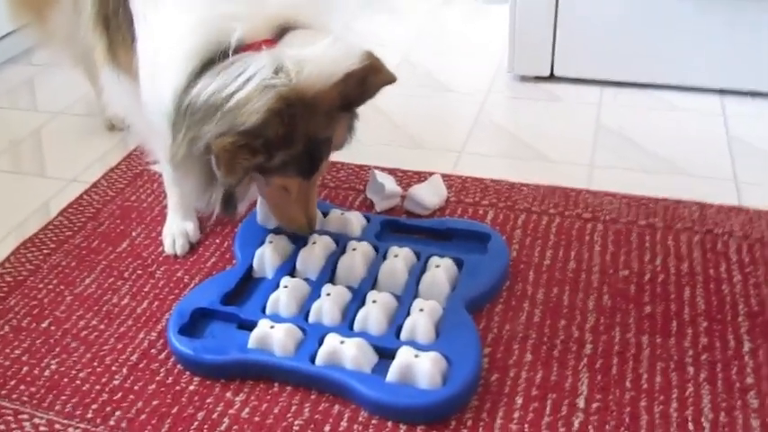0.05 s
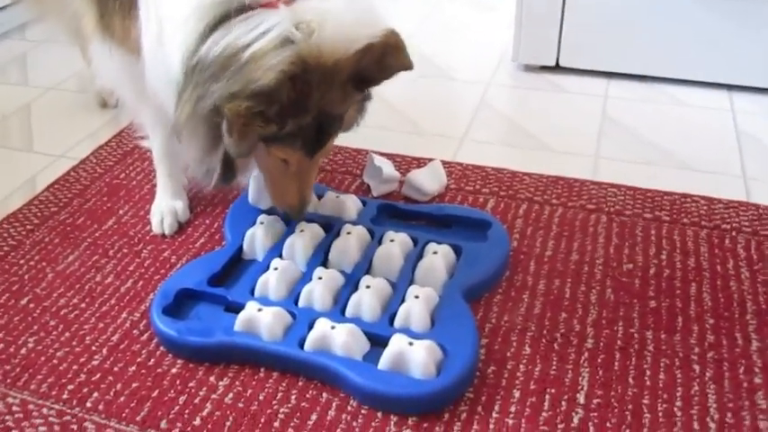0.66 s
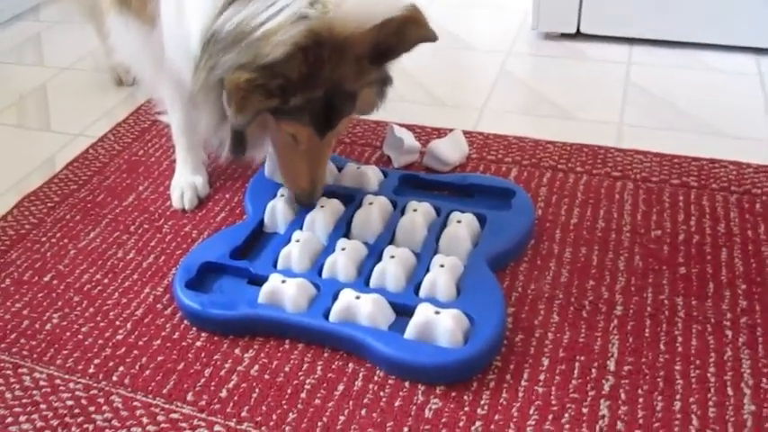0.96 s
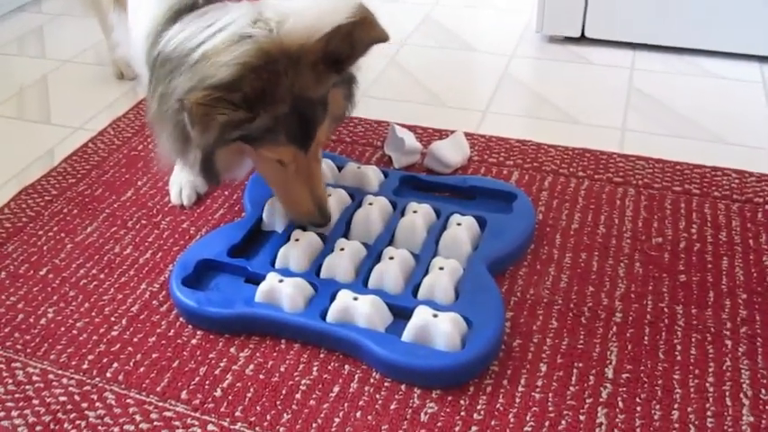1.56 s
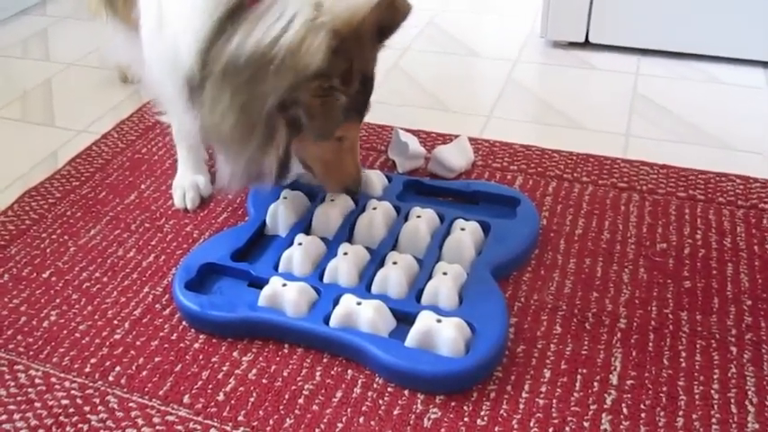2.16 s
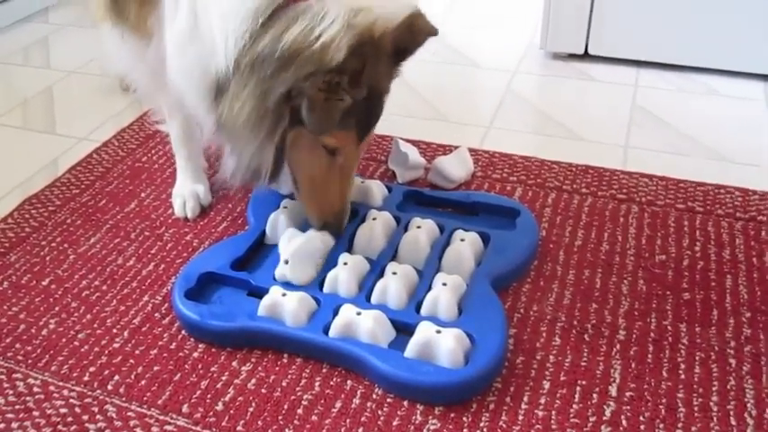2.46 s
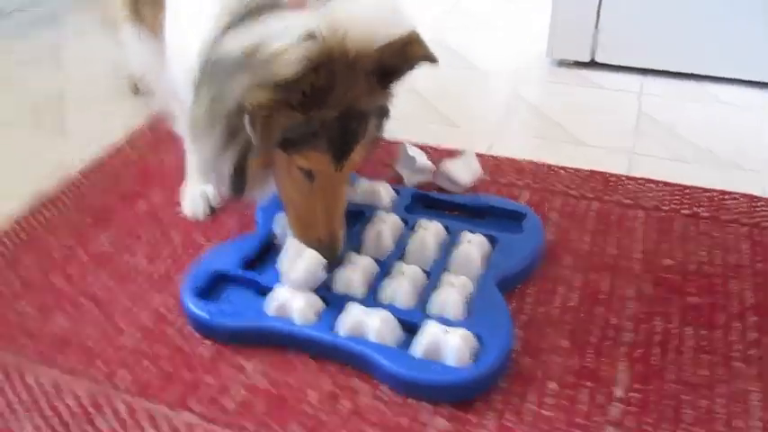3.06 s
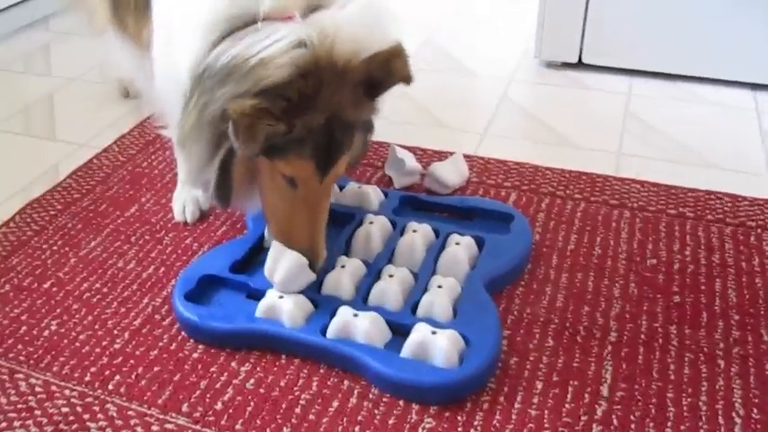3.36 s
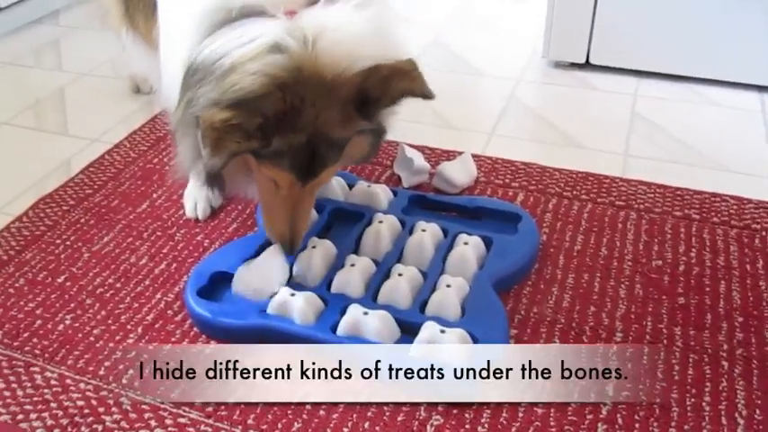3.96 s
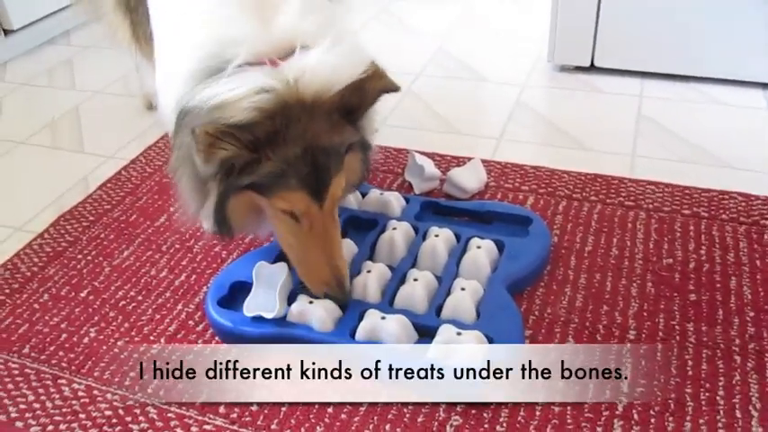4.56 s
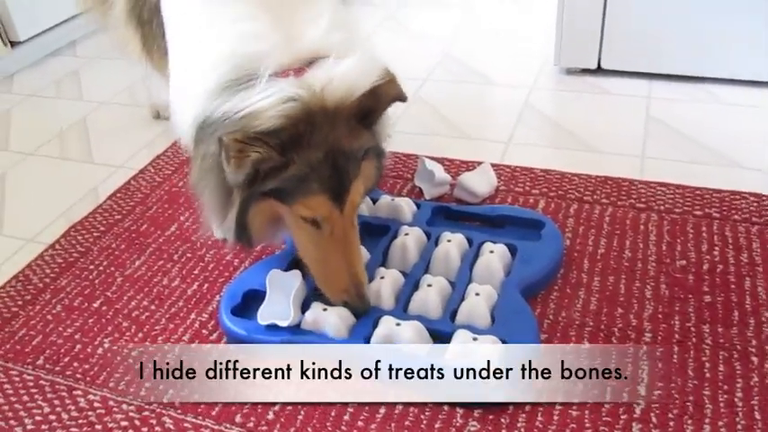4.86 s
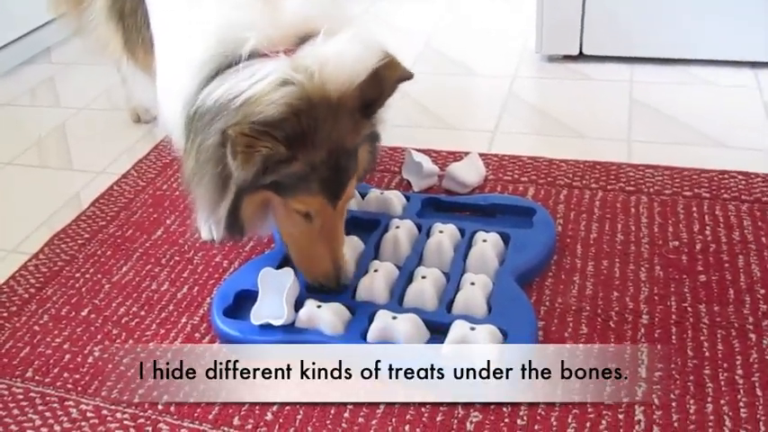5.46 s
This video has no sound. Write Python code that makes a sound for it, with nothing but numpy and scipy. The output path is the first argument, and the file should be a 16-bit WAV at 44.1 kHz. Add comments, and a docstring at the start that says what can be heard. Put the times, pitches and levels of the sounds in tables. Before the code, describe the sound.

A dog nudges plastic bones around a puzzle tray, making irregular hollow clacks and short scrapes that ring briefly in a tiled room.

```python
"""A dog at a puzzle tray

A dog noses hollow plastic bones about in a moulded tray on a rug in a tiled kitchen. The pieces knock,
slide and rattle in their wells, and the tray thuds on the rug. Fur brushes the plastic and a collar tag
tinkles. The hard room rings after every knock, over a faint steady rumble and hiss."""
import sys
import numpy as np
from scipy import signal
from scipy.fft import rfft, irfft
from scipy.io import wavfile

SR = 44100
rng = np.random.default_rng(int(sys.argv[2]) if len(sys.argv) > 2 else 0)


def transcribe(signal):
    """Save signal, clipped to [-1, 1], as a 16-bit WAV file at the path in sys.argv[1]."""
    frames = np.atleast_2d(signal).T
    limited = np.clip(frames, -1, 1)
    pcm = np.round(limited * 32767).astype(np.int16)
    wavfile.write(sys.argv[1], SR, pcm)


N = 252252
TIME = np.arange(N) / SR


def from_db(db):
    """Turn decibels into a number to multiply by."""
    return 10 ** (np.asarray(db) / 20)


def rms_one(x):
    """Scale a sound so that its average level (rms) is 1."""
    return x / np.sqrt(np.mean(x ** 2) + 1e-20)


def at_hz(rows, hz):
    """Read between the rows of a table whose first column is frequency."""
    points, *columns = np.transpose(rows)
    return [np.interp(np.log(hz + 1e-9), np.log(points), c) for c in columns]


def band(x, low, high, order=2):
    """Keep the part of a sound between two frequencies in Hz."""
    sos = signal.butter(order, [low, min(high, SR / 2 - 1)], "band", fs=SR, output="sos")
    return signal.sosfilt(sos, x)


def add(out, s, sound):
    """Mix a sound in at a time in seconds."""
    start = max(round(s * SR), 0)
    out[start:start + len(sound)] += sound[:max(N - start, 0)]


def dying(t, t60):
    """A fade. Its ring time, t60, is the seconds it takes to fall 60 dB."""
    return np.exp(-np.log(1000) * t / t60)


def resonate(x, hz, t60):
    """Make a sound ring at one pitch."""
    r = np.exp(-np.log(1000) / (t60 * SR))
    feedback = [1, -2 * r * np.cos(2 * np.pi * hz / SR), r * r]
    return signal.lfilter(np.array([1, 0, -1]) * (1 - r * r) / 2, feedback, x + 1e-18)


def ring_together(x, tones):
    """Make a sound ring at several pitches, every second one flipped in sign."""
    return sum((-1) ** k * from_db(db) * resonate(x, hz, t60) for k, (hz, db, t60) in enumerate(tones))


def burst(t60, first_touch=2.39, size=2600):
    """The force of one touch: a first contact, then a quick crunch of tiny ones."""
    force = rng.standard_normal(size) * dying(TIME[:size], t60)
    force[0] += first_touch
    return force


def struck(x, db, size=220):
    """Scale a ring so that its first 5 milliseconds have the given level."""
    return from_db(db) * x / np.sqrt(np.mean(x[:size] ** 2))


# The tone of the background. Each row: frequency in Hz, relative level in dB.
BACKGROUND_TONE = [(15, 11), (25, -5), (74, 1.5), (130, -6.5), (195, -6), (363, -8), (545, -10),
                   (887, -12.5), (2610, -19.5), (3520, -19.5), (4250, -20), (5140, -22), (8140, -26),
                   (14800, -33.5), (16000, -30)]

def background(level_db=-55):
    """Steady house rumble and microphone hiss."""
    db, = at_hz(BACKGROUND_TONE, np.fft.rfftfreq(N, 1 / SR))
    noise = irfft(rfft(rng.standard_normal(N)) * from_db(db), N)
    return from_db(level_db) * rms_one(band(noise, 25.6, 13000))


# The room's echo. Each row: frequency in Hz, dB against the direct sound, ring time in seconds.
ROOM_ECHO = [(149, -4, 0.4), (480, -3, 0.43), (970, -2.5, 0.36), (1610, -1.5, 0.41), (3500, -8, 0.39),
             (6340, -3.5, 0.42), (14300, -18.5, 0.74)]

def kitchen(first_echo_s=0.0024, build_s=0.00021, lumpy_db=4.0, count=16, size=22000):
    """How a click carries from each place on the tray: directly, then off tiles and cupboards."""
    t = TIME[:size]
    arrival = 1 - np.exp(-np.maximum(t - first_echo_s, 0) / build_s)
    lumps = np.repeat(rng.standard_normal((count, size // 40 + 1)), 40, axis=1)[:, :size]
    unevenness = from_db(lumpy_db * lumps * dying(t, 0.091))   # early echoes stand out, later ones blur
    echoes = rng.standard_normal((2, count, size)) * arrival * unevenness
    places = np.zeros((count, size))
    edges_hz = np.geomspace(100, 18000, num=16)
    for k, (low, high) in enumerate(zip(edges_hz, edges_hz[1:])):
        db, t60 = at_hz(ROOM_ECHO, np.sqrt(low * high))
        tail = band(echoes[k % 2] * dying(t, t60), low, high, order=3)
        energy = np.sum(tail ** 2, axis=1, keepdims=True)
        places += from_db(db) * tail * np.sqrt(2 * (high - low) / SR / energy)
    places[:, 0] += 1   # the direct sound
    return places


# Bumps on the rug. Each row: start in seconds, lowest pitch in Hz, strength in dB.
RUG_THUDS = [(.034, 237, -28.5), (1.572, 74.6, -52), (3.698, 80, -44), (4.04, 77, -32), (4.529, 78, -49)]
# Tones of the bending tray. Each row: multiple of the lowest pitch, relative dB, cycles to die away.
BENDING_TONES = [(1, 0, 19), (1.5, 8, 12.2), (2.75, -6.5, 18)]

def thuds(rise_s=0.0077, size=22000):
    """The whole tray bends and bumps softly into the rug."""
    out, t = np.zeros(N), TIME[:size]
    rise = 1 - np.exp(-t / rise_s)
    for s, lowest_hz, db in RUG_THUDS:
        for multiple, tone_db, cycles in BENDING_TONES:
            hz = lowest_hz * multiple
            tone = np.sin(2 * np.pi * hz * t) * dying(t, cycles / hz)
            add(out, s, from_db(db + tone_db) * tone * rise)
    return out


# The tag touches its ring. Each row: start in seconds, strength in dB.
TAG_TINKLES = [(.115, -64), (1.666, -67), (2.182, -53), (2.187, -45.5), (2.192, -44), (2.335, -50),
               (3.78, -60)]
# The tag's tones. Each row: pitch in Hz, relative level in dB, ring time in seconds.
TAG_TONES = [(3500, -10, 0.0026), (7670, 1, .022), (8300, 0, .01), (9800, -6, 0.0017), (12750, -6, 0.084),
             (12600, -15, 0.014), (14700, -22, .008)]

def collar_tag(rub_t60=0.035):
    """A small metal tag rubs its ring and gives a short, high tinkle."""
    out = np.zeros(N)
    for s, db in TAG_TINKLES:
        for hz, tone_db, t60 in TAG_TONES:
            add(out, s, struck(resonate(burst(rub_t60), hz, t60), db + tone_db))
    return out


# Strokes of the muzzle. Each row: start and end in seconds, dB it swells to, centre pitch in Hz.
FUR_BRUSHES = [(0.392, 0.436, -48.5, 5500), (3.921, 4.054, -55, 1730), (4.197, 4.576, -52, 5560),
               (5.179, 5.397, -50, 3150), (5.537, 5.595, -54.5, 7000)]

def brushes(grain_db=4, ring_cycles=12, air_db=4.5, swell_db=8):
    """Fur rubs on plastic: a grainy, swelling swish with airy noise around it."""
    for start, end, db, hz in FUR_BRUSHES:
        size = round((end - start) * SR)
        noise, grain = rng.standard_normal((2, size))
        friction = noise * from_db(grain_db * grain)
        swish = rms_one(resonate(friction, hz, ring_cycles / hz))
        air = from_db(air_db) * rms_one(band(friction, hz / 4, 1.8 * hz))
        swell = from_db(np.linspace(db - swell_db, db, size))
        yield start, swell * rms_one(swish + air) * signal.windows.tukey(size, 0.4)


# The walls' longer tones. Each row: pitch in Hz, dB against the direct sound, ring time in seconds.
WALL_TONES = [(693, -7, 0.14), (918, -10, 0.11), (1170, 0, 0.74), (1387, 3.5, 0.066), (1687, 0.5, 0.079),
              (3410, -10, 0.18)]

def tray_walls(x):
    """The walls of the tray ring on after a touch."""
    return x + ring_together(x, WALL_TONES)


# The tray's low tones. Each row: pitch in Hz, relative level in dB, ring time in seconds.
BODY_TONES = [(289, -11, 0.039), (438, -11.5, 0.037), (610, -10.5, 0.018), (691.4, -4, 0.037),
              (880, 1.5, 0.02), (945, 2.5, 0.02), (1150, -8.5, 0.0087)]

def tray_body(force):
    """The body of the tray answers a force with a short, low ring."""
    return band(ring_together(force, BODY_TONES), 470, 1200)


def tray_share_db(hz, db_per_octave=-10, usual_hz=1116):
    """Pieces that sound higher move the tray less."""
    return db_per_octave * np.log2(max(hz / usual_hz, 1))


def scrape(seconds, first_db, last_db, chatter_hz, rasp_db, slips_per_s=5000, spread_db=2.5):
    """Many tiny slips shake a piece's shell and the tray; its edge adds rasp and hiss."""
    size = round(max(seconds, 0.01) * SR)
    slips = (rng.random(size) < slips_per_s / SR) * rng.choice([-1, 1], size)
    slips = slips * from_db(spread_db * np.minimum(rng.exponential(1, size), 3))
    chatter = resonate(slips, chatter_hz, t60=0.0053)
    shell = rms_one(band(chatter, 0.74 * chatter_hz, 1.43 * chatter_hz))
    rasp = from_db(rasp_db) * rms_one(band(slips, 2820, 4910))
    hiss = from_db(rasp_db - 10) * rms_one(band(band(slips, 3760, 11200), 3200, 6400, order=1))
    body = from_db(tray_share_db(chatter_hz) - 5) * rms_one(tray_body(slips))
    level = from_db(np.linspace(first_db, last_db, size) - 2)
    return rms_one(shell + rasp + hiss + body) * level * signal.windows.tukey(size, 0.2)


# Pushes of the nose. Each row: start and end in seconds, final strength in dB, chatter pitch in Hz,
# rasp in dB against the chatter.
NOSE_PUSHES = [(0.032, 0.066, -33, 720, -4), (0.4, 0.463, -36, 1285, -8), (0.757, 0.795, -25, 818, -2),
               (1.428, 1.476, -35.5, 1210, -6.5), (1.503, 1.583, -34, 1290, -9.5),
               (1.944, 2.061, -44, 1050, -9.5), (2.292, 2.384, -33, 1200, -7),
               (2.39, 2.435, -27, 1600, 4.5), (2.442, 2.55, -29, 1440, -11),
               (2.552, 2.585, -33.5, 1930, -49), (2.844, 2.907, -28.5, 1366, -16),
               (3.361, 3.381, -36, 1320, -16), (3.559, 3.585, -45, 1210, -9),
               (3.656, 3.724, -36, 1270, -11.5), (3.746, 3.778, -38, 1240, -9),
               (4.545, 4.568, -26.5, 930, -3), (5.187, 5.214, -50, 1120, -11),
               (5.412, 5.451, -30, 970, -12.5), (5.649, 5.718, -36, 1345, -9.5)]

def pushes(swell_db=3.5):
    """A piece slides along its well, growing louder as the nose leans in."""
    for start, end, db, chatter_hz, rasp_db in NOSE_PUSHES:
        yield start, scrape(end - start, db - swell_db, db, chatter_hz, rasp_db)


# A piece hits the wall of its well. Each row: start in seconds, strength in dB, clack pitch in Hz,
# hardness in dB (harder is brighter).
PIECE_KNOCKS = [(0.035, -25.5, 1850, -15), (0.047, -20, 1090, -34), (0.148, -21, 1170, -19.5),
                (0.23, -52.5, 1150, -8), (0.284, -18.5, 1250, -7.5), (0.418, -36.5, 1170, -9),
                (0.524, -37, 1320, -16), (0.547, -24.5, 1160, -12.5), (0.7, -57, 1210, 10),
                (0.764, -14, 1060, -7), (0.768, -16.5, 1150, -3), (0.785, -11.5, 1350, -4),
                (0.958, -32.5, 1140, -11.5), (1.029, -31.5, 1130, -14.5), (1.398, -48.5, 1670, 9),
                (1.455, -19.5, 1170, -7.5), (1.563, -19, 1380, -18), (1.574, -24, 1120, -9),
                (1.738, -25, 1320, -21), (1.922, -35.5, 1340, -18), (1.937, -28.5, 1610, -9.5),
                (2.316, -20, 1520, -5.5), (2.368, -9, 1170, -7), (2.372, -18.5, 1040, -6),
                (2.421, -21.5, 1310, -2.5), (2.431, -10.5, 1300, -18), (2.508, -11, 1610, -21),
                (2.519, -11, 1490, -12.5), (2.548, -19, 1830, -1), (2.551, -5, 2080, -16.5),
                (2.671, -20, 1360, -9), (2.779, -34.5, 1600, -34), (2.843, -20, 1460, -14.5),
                (2.867, -11.5, 1440, -10.5), (2.952, -25, 1620, -15), (2.995, -23, 1100, -25),
                (3.196, -25, 1100, -11), (3.201, -20.5, 1120, -14), (3.374, -21, 1130, -20.5),
                (3.698, -21, 1140, -4), (3.703, -13.5, 1160, -18.5), (3.76, -20.5, 1250, -14),
                (3.933, -40, 1170, -12.5), (4.053, -27, 1490, -5.5), (4.06, -5.5, 1180, -5.5),
                (4.067, -13.5, 1010, -11), (4.123, -14.5, 1080, -15), (4.199, -17, 1110, -5),
                (4.214, -20.5, 1200, -9), (4.277, -20, 1870, -6), (4.293, -17.5, 1157, -8.5),
                (4.353, -29, 1040, -20), (4.428, -20, 1170, -15.5), (4.553, -12, 1054, -7),
                (4.576, -19, 1230, -12.5), (4.657, -16, 1540, -2), (4.667, -20.5, 2270, 1),
                (4.877, -33, 1270, 4), (4.888, -24.5, 1340, -10.5), (4.918, -31, 1393, -6.5),
                (4.939, -29, 1390, -12), (4.975, -41, 1100, 2.5), (5.07, -41, 1350, -11),
                (5.193, -35, 1090, -17.5), (5.426, -17.5, 1460, -11), (5.563, -45, 1150, 2.5)]

def knocks(firm_db=-29):
    """Each hit sounds the tray's body, the piece's hollow clack, its edge's click and a high snap."""
    for start, db, clack_hz, hard_db in PIECE_KNOCKS:
        body_db = db - 15 + tray_share_db(clack_hz)
        clack_db = db - 10
        click_db = db - 4.5 + hard_db
        snap_db = db - 17 + 0.83 * hard_db
        # Light touches drag on; strong ones are over at once.
        drag = np.exp(-0.13 * (max(body_db, clack_db, click_db) - firm_db))
        # Only the loudest snaps reach the top of the treble.
        top_hz = np.interp(snap_db, [-50, -36, -29], [8500, 9500, 14500])
        body = tray_body(burst(0.0087 * drag))
        clack = resonate(burst(0.012 * drag), clack_hz, t60=0.0048)
        click = resonate(burst(0.016 * drag), hz=3297, t60=0.0033)
        snap = resonate(burst(0.016 * drag), hz=5700, t60=0.00096)
        yield start, (struck(body, body_db)
                      + struck(band(clack, 0.59 * clack_hz, 1.82 * clack_hz), clack_db)
                      + struck(band(click, 1810, 5970), click_db)
                      + struck(band(snap, 4100, top_hz), snap_db))


def rattles(above_db=-20, seconds=0.0543, fade_db=9):
    """After a strong knock the piece chatters at its own pitch until it lies still."""
    for start, db, clack_hz, hard_db in PIECE_KNOCKS:
        if db > above_db:
            first_db = db - 17.5
            yield start, scrape(seconds, first_db, first_db - fade_db, clack_hz, rasp_db=hard_db - 2)


def puzzle(places):
    """Each sound on the plastic takes the echo of the next place on the tray in turn."""
    out = np.zeros(N)
    for k, (start, sound) in enumerate([*knocks(), *pushes(), *brushes(), *rattles()]):
        add(out, start, signal.fftconvolve(sound, places[k % len(places)]))
    return out


def scene():
    """The background, the thuds, the collar and the puzzle, heard from one spot in the kitchen."""
    places = kitchen()
    around = background() + signal.oaconvolve(thuds() + collar_tag(), places[0])[:N]
    return (around + puzzle(tray_walls(places)))[None]


def gain_control(x, threshold_db=-24.5, slope=0.67, recovery_db_per_s=2, sense_s=0.062):
    """Loud clatter turns the volume down; it creeps back afterwards."""
    r = np.exp(-1 / (sense_s * SR))
    power = signal.lfilter([1 - r], [1, -r], x[0] ** 2)
    level_db = 10 * np.log10(power + 1e-12)
    cut_db = slope * np.maximum(level_db - threshold_db, 0)
    recovery_db = recovery_db_per_s * TIME
    return x * from_db(recovery_db - np.maximum.accumulate(cut_db + recovery_db))


def record(dry, peak_limit=0.91, cutoff_hz=15850):
    """Loud moments are turned down, peaks are rounded and the highest treble is cut away."""
    rounded = peak_limit * np.tanh(gain_control(dry) / peak_limit)
    treble_cut = signal.ellip(10, 0.1, 80, cutoff_hz, fs=SR, output="sos")
    return signal.sosfilt(treble_cut, rounded)


dry = scene()
out = record(dry)
transcribe(out)
```